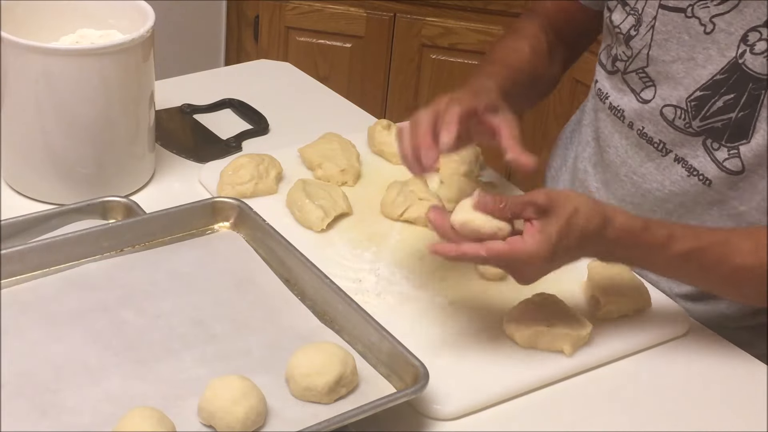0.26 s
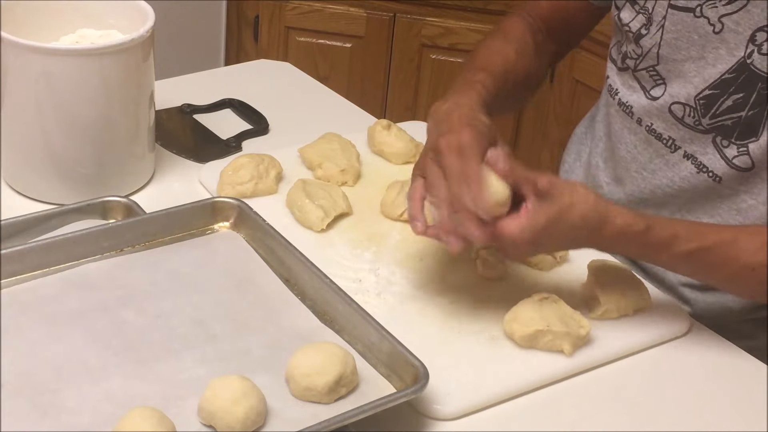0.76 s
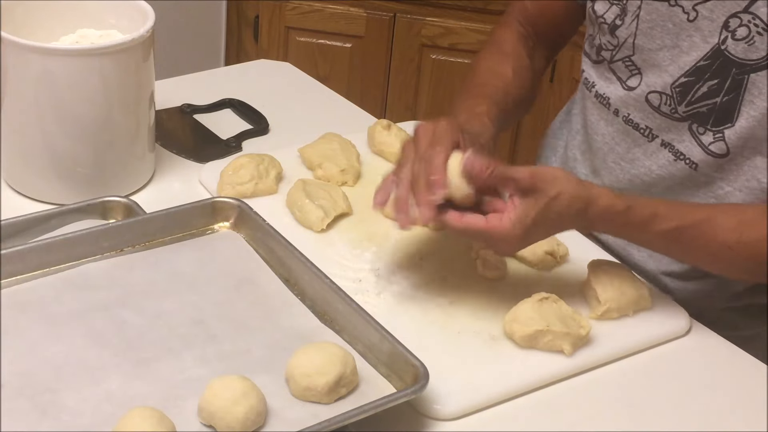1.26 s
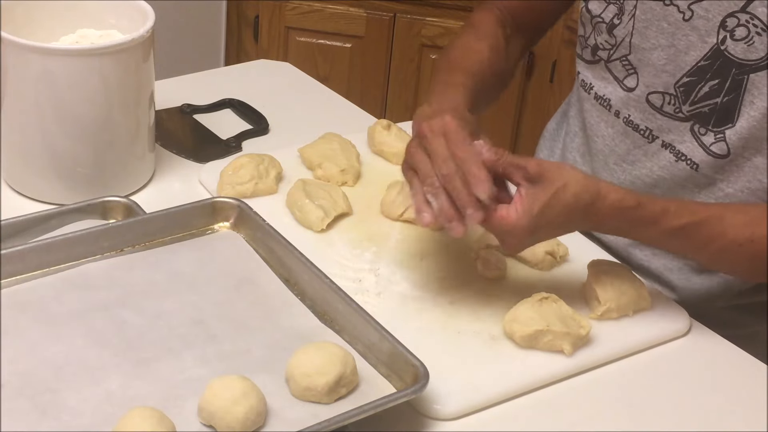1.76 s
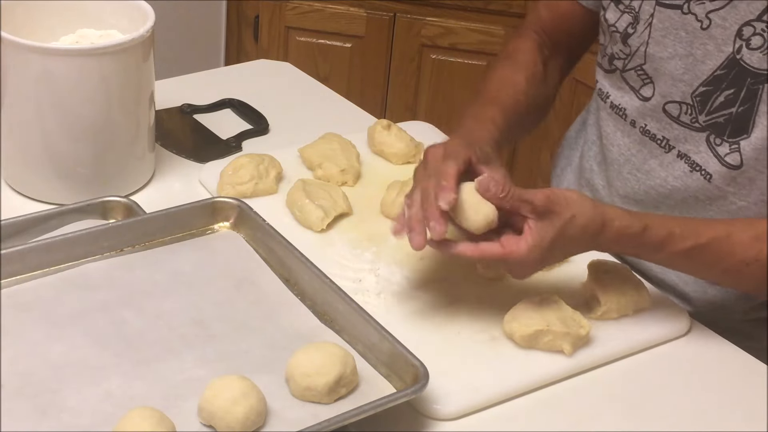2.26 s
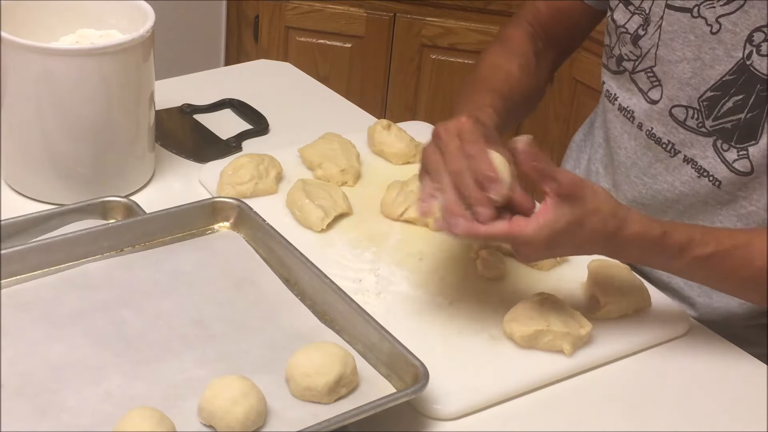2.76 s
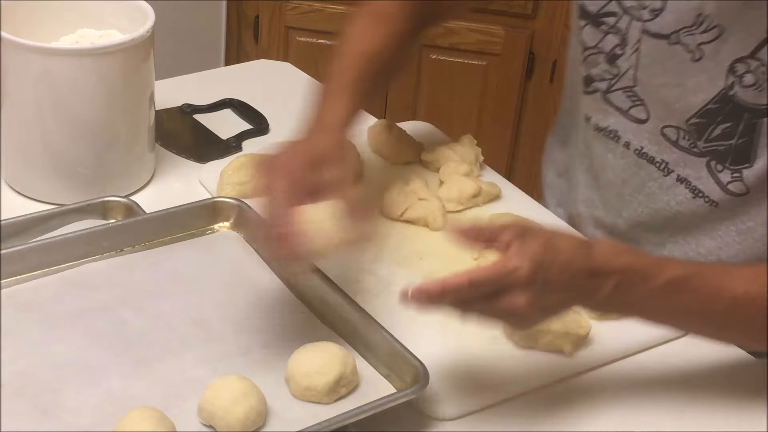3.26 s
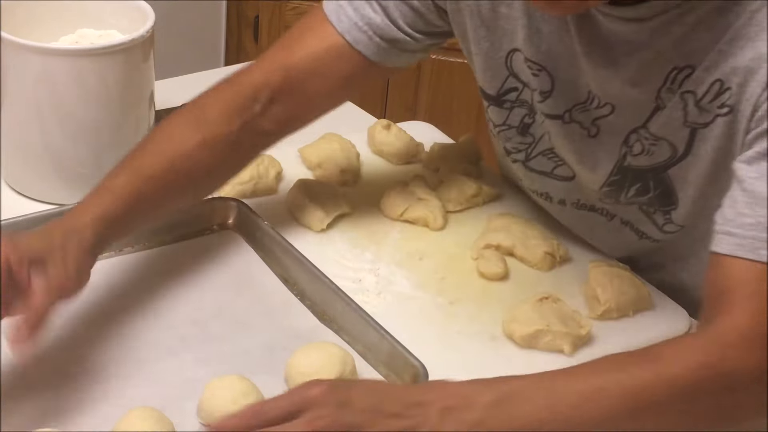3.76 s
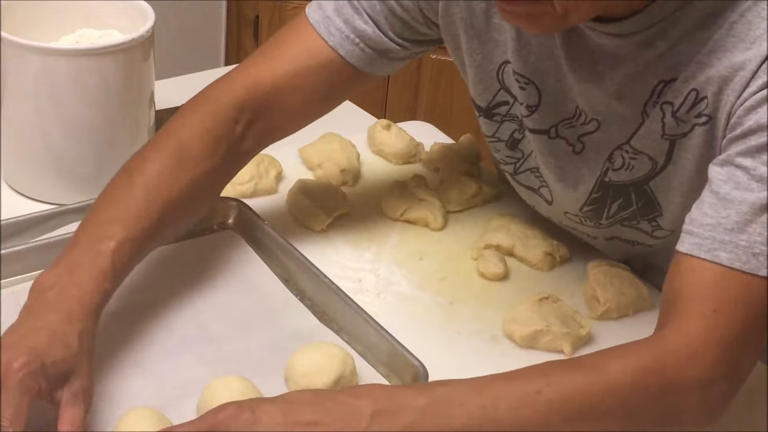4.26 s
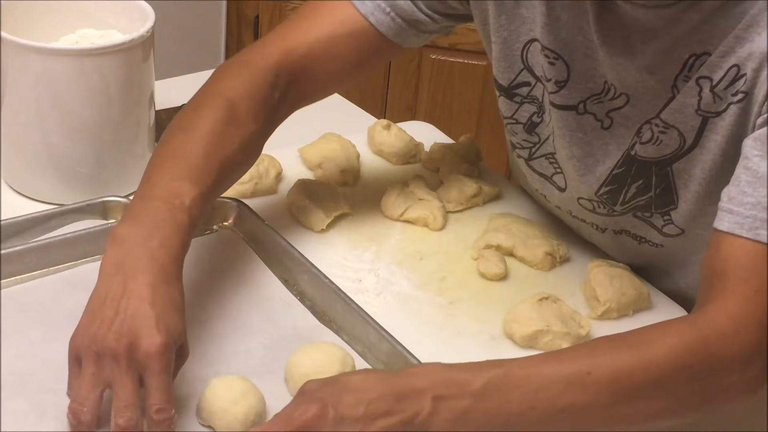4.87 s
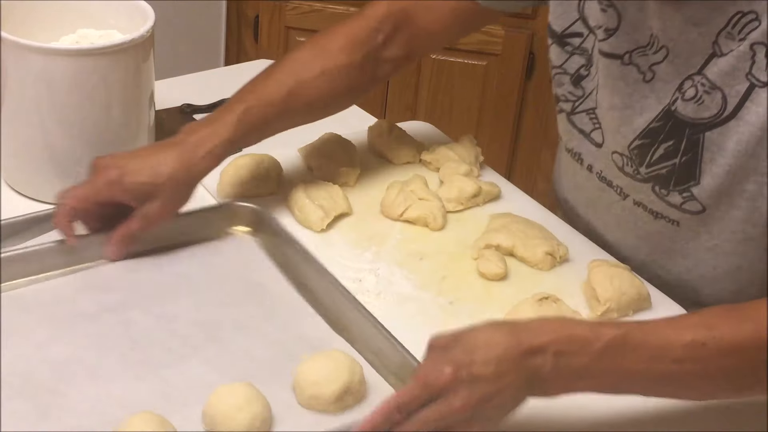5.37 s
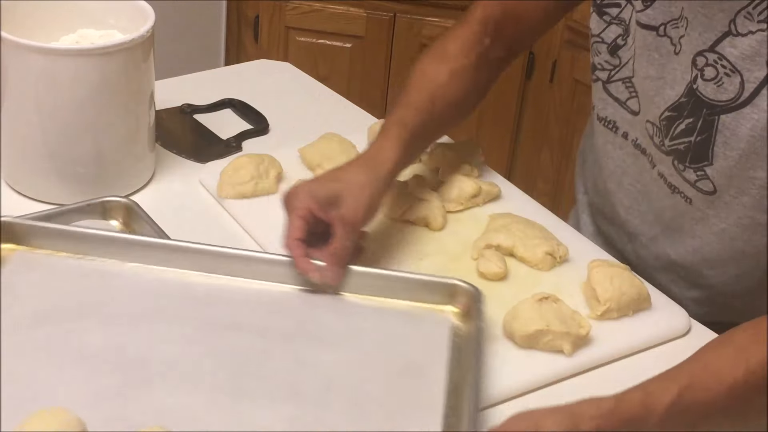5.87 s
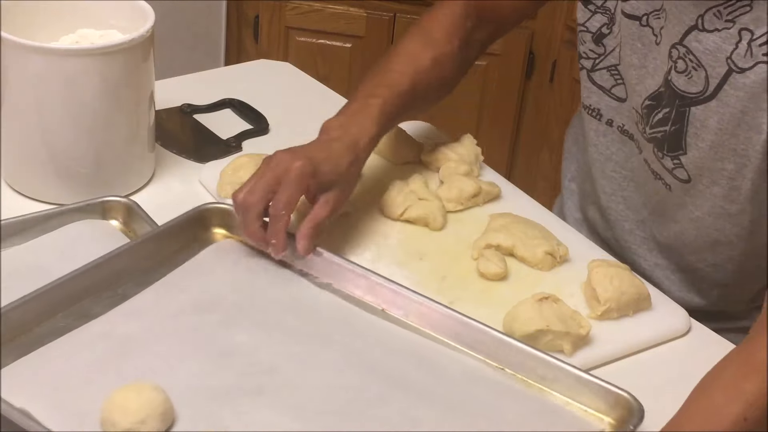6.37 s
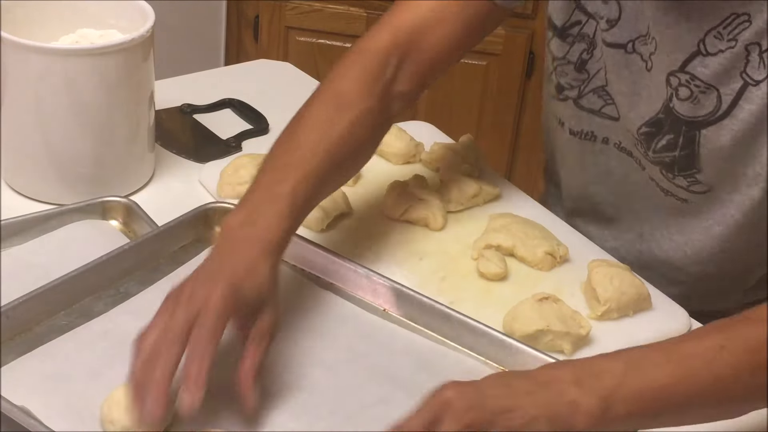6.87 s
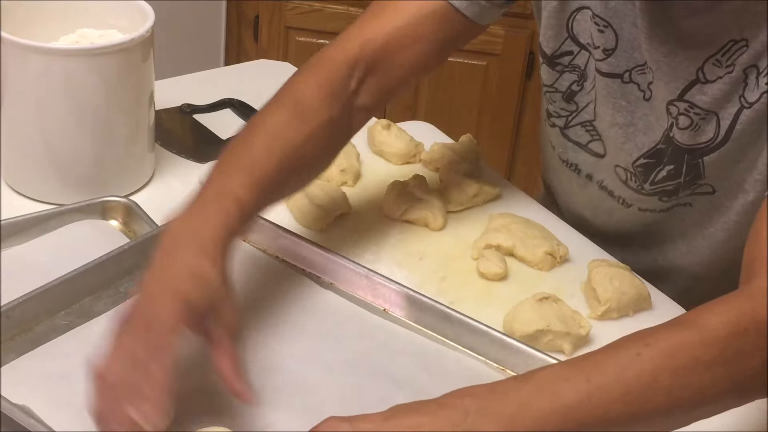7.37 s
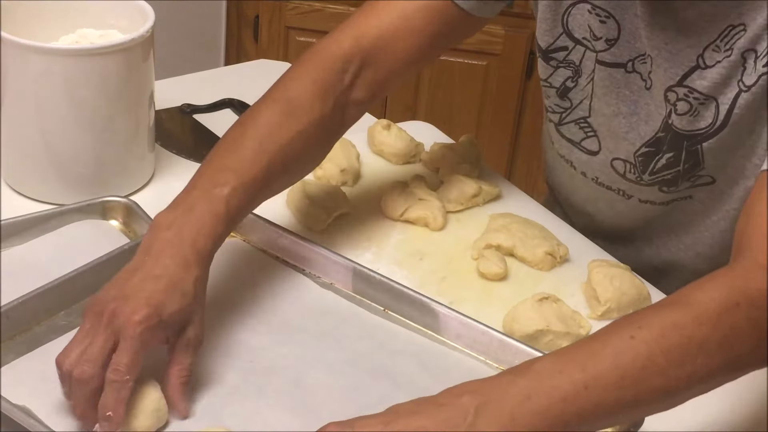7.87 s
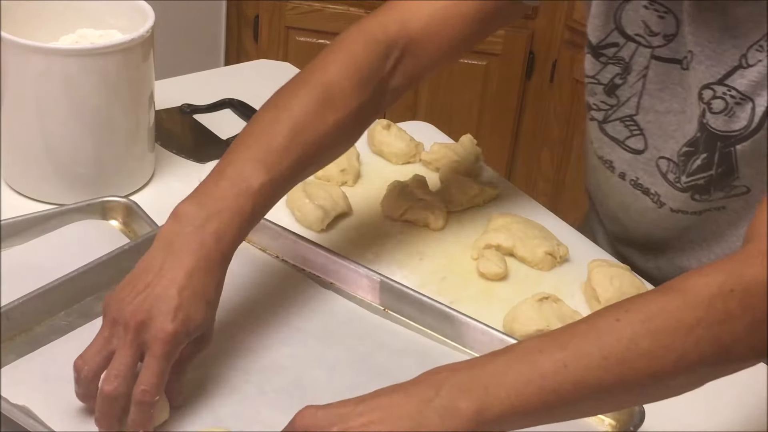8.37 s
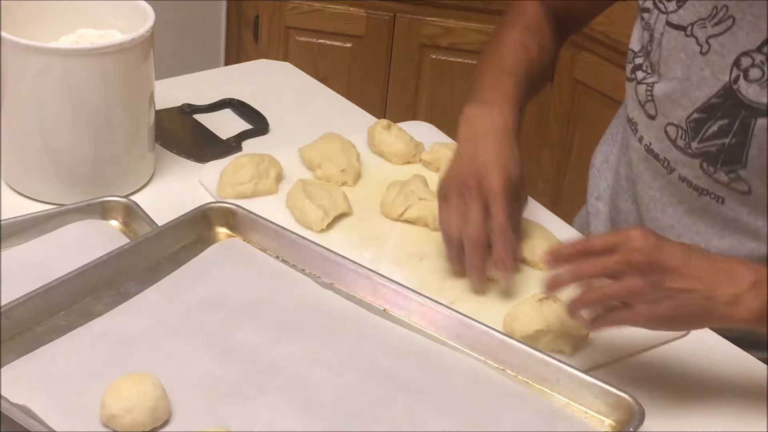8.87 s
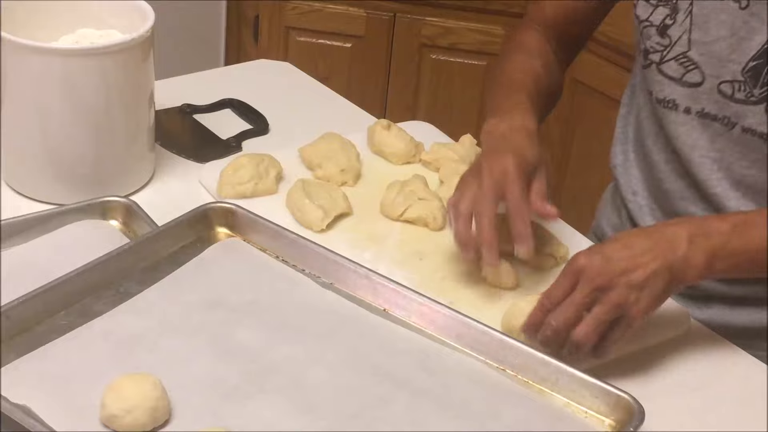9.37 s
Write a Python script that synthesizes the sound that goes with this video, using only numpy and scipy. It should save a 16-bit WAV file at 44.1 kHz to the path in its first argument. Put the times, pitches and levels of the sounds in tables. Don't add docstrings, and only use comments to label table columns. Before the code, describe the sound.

A low, slightly wavering refrigerator hum, near 60 and 120 Hz, continues throughout, heard by one close microphone in a hard-walled kitchen with short reverberation. From 0 to 3.2 seconds, palms roll dough: faint, airy, uneven skin strokes with tiny ticks. A soft thump at 3.4 precedes a loud metal tray knock at 3.7, a sharp crack with rapid bounces, paper rattle, counter boom and a brief ring. From 4 to 5.2, fingers rustle lining paper, with a crisp tick at 4.8. Thumps at 5.35 lead into a gritty, ringing drag around 5.5, a lighter push back from 5.85, and a final clicking scrape at 6.25-6.4. After near quiet, paper rubs and soft metallic creaks fill 7-8.7. At 9.3 a plastic board lands with a short dull clack and small bounces, leaving the hum.

```python
import sys
import numpy as np
from scipy import signal
from scipy.fft import rfft, irfft, next_fast_len
from scipy.io import wavfile
from scipy.ndimage import uniform_filter1d

SR = 44100
rng = np.random.default_rng(int(sys.argv[2]) if len(sys.argv) > 2 else 0)


def unload_audio(sound):
    columns = np.transpose(np.atleast_2d(sound))
    steps = np.round(np.clip(columns, -1, 1) * 32767)
    wavfile.write(sys.argv[1], SR, steps.astype(np.int16))


def ratio_of_db(decibels):
    return 10 ** (np.asarray(decibels, float) / 20)


N = 424241


def unit(x):
    return x / np.sqrt(np.mean(x ** 2))


def steady(x):
    return x / np.sqrt(uniform_filter1d(x ** 2, size=4000) + 1e-12)


def colour(x, points):
    hz, db = np.transpose(points)
    size = next_fast_len(len(x))
    f = np.maximum(np.arange(size // 2 + 1) * SR / size, 1)
    gain = ratio_of_db(np.interp(np.log(f), np.log(hz), db))
    return irfft(rfft(x, size) * gain, size)[:len(x)]


def band(x, lo_hz, hi_hz):
    sos = signal.butter(2, [lo_hz, min(hi_hz, 20000)], "band", fs=SR, output="sos")
    return signal.sosfilt(sos, x)


def ring(x, modes):
    out = np.zeros(N)
    live = np.flatnonzero(abs(x) > 1e-7)
    span = slice(live[0], live[-1] + SR)
    for hz, db, t60_s in modes:
        r = np.exp(-np.log(1000) / (np.clip(t60_s, .003, .42) * SR))
        w = 2 * np.pi * hz / SR
        out[span] += signal.lfilter([ratio_of_db(db) * np.sin(w)], [1, -2 * r * np.cos(w), r * r], x[span])
    return out


def walk(rate_hz):
    knots = rng.standard_normal(1000)
    return 1.4 * np.interp(np.arange(N) * (rate_hz / SR), np.arange(len(knots)), knots)


def grit(spread_db):
    return unit(rng.standard_normal(N) * ratio_of_db(spread_db * rng.exponential(size=N)))


def burst(at_s, db, decay_s):
    marks = np.zeros(N)
    marks[(np.asarray(at_s) * SR).astype(int)] = ratio_of_db(db)
    envelope = signal.lfilter([1], [1, -np.exp(-1 / (decay_s * SR))], marks)
    return envelope * rng.standard_normal(N)


def push(at_s, db, contact_s):
    marks = np.zeros(N)
    marks[(np.asarray(at_s) * SR).astype(int)] = ratio_of_db(db) * (-1) ** np.arange(len(db))
    shape = np.hanning(int(contact_s * SR) + 3)
    return signal.lfilter(shape / shape.sum(), [1], marks)


def strokes(rows, spread=1):
    depth_db = 20
    t = np.arange(0, N / SR, .002)
    s, db, rise_s, fall_s = np.array(rows)[:, :4, None].transpose(1, 0, 2)
    away = np.maximum((s - t) / rise_s, (t - s) / fall_s) / spread
    gain = np.sqrt(np.sum(ratio_of_db(db - depth_db * away) ** 2, axis=0))
    return np.interp(np.arange(N) / SR, t, gain)


def curves(tables):
    rows = np.concatenate(tables)
    t = np.arange(N) / SR
    hiss_db, drive_db = [np.interp(t, rows[:, 0], c, left=-110, right=-110) for c in rows.T[1:3]]
    return hiss_db, drive_db, np.interp(t, rows[:, 0], rows[:, 3])


# (multiple, level [dB rms], lower line [dB], upper line [dB])
HUM = [(1, -55, -66, -67), (2, -53.5, -71, -80), (3, -67, -70.5, -80), (4, -75, -76, -75),
       (5, -66, -65.5, -75), (6, -71, -72, -82), (7, -75, -80, -77), (8, -74, -80, -79),
       (9, -77, -75.5, -81), (10, -73.5, -79, -78), (11, -79, -86, -85), (12, -66.5, -81, -77),
       (13, -84, -88, -85), (14, -86, -81, -88), (16, -86, -81, -88), (19, -81, -87, -86)]
# (frequency [Hz], width [Hz], level [dB rms])
CABINET = [(60, 41, -63), (308.8, 60, -66), (208.6, 18, -66), (613, 32, -69)]
# (frequency [Hz], density [dB per Hz])
AIR = [(21, -31), (35, -3.5), (123, -6), (162, -9.5), (292, -6.5), (527, -16), (646, -21.5), (716, -13.5),
       (773, -15.5), (1020, -19), (1660, -31.5), (5000, -44), (6790, -46), (14300, -48.5), (15800, -46.5)]
PISTON_HZ, WOBBLE_HZ, AIR_DB = 58.9, 11.78, -54


def fridge():
    turn = 2 * np.pi * np.arange(N) / SR
    lines = 0
    for k, db, lower_db, upper_db in HUM:
        hz, lag = k * PISTON_HZ, 2 * np.pi * rng.random(2)
        lower = ratio_of_db(lower_db) * np.cos((hz - WOBBLE_HZ) * turn + lag[0])
        upper = ratio_of_db(upper_db) * np.cos((hz + WOBBLE_HZ) * turn + lag[1])
        pull = ratio_of_db(db) * np.cos(hz * turn + .12 * k * walk(1.5))
        lines = lines + np.sqrt(2) * ratio_of_db(walk(2)) * (lower + upper - pull)
    cabinet = 0
    for hz, w, db in CABINET:
        cabinet = cabinet + ratio_of_db(db) * unit(band(rng.standard_normal(N), hz - w / 2, hz + w / 2))
    air = ratio_of_db(AIR_DB + .7 * walk(2.6)) * unit(colour(rng.standard_normal(N), AIR))
    return lines + cabinet + air


# (time [s], peak [dB], pitch [Hz])
BUMPS = [
    (0.828, -39, 61.9),
    (3.371, -32.5, 100),
    (5.335, -30.5, 102),
    (5.35, -32, 99.6),
    (5.449, -35.5, 110),
    (6.14, -39, 287),
    (6.242, -37.5, 202),
    (9.001, -39, 126.4),
    (9.39, -36, 70.0),
]


def bumps():
    out = np.zeros(N)
    t = np.arange(int(.15 * SR)) / SR
    envelope = (t / 0.011) * np.exp(1 - t / 0.0082)
    for s, db, hz in BUMPS:
        i = int(s * SR)
        out[i:i + len(t)] += ratio_of_db(db) * np.sin(2 * np.pi * hz * t) * envelope
    return out


# (time [s], level [dB])
BOARD = [
    (9.329, -33),
    (9.342, -38),
    (9.365, -38),
    (9.399, -45),
]
# (frequency [Hz], level [dB], t60 [s])
BOARD_MODES = [(195, -18, 0.089), (248, -11.5, 0.19), (315.5, 5, 0.097), (420, -1, 0.022), (594, 1, 0.076),
               (726, -11, 0.072), (797, 12, 0.013), (912, -12, .1), (1184, -29, .06)]


def board():
    s, db = np.transpose(BOARD)
    edge = band(push([9.3205], [-35], 0.00046), 470, 3000)
    return ring(edge + push(s, db - 3, 0.0012), BOARD_MODES)


# (peak time [s], peak [dB], rise [s], fall [s])
ROLLS = [(.29, -74, .18, .05), (.47, -71.5, .02, 0.25), (.68, -70.5, 0.063, 0.23), (.75, -74, .1, .04),
         (.91, -64.5, 0.07, 0.073), (1.26, -62.5, 0.091, 0.22), (1.52, -64, 0.019, 0.041),
         (1.59, -63, 0.056, .05), (1.67, -66.5, .02, 0.14), (1.72, -71, 0.11, 0.055),
         (1.92, -65, .16, .045), (2.0, -68.5, .02, 0.2), (2.2, -65.5, 0.063, 0.1),
         (2.32, -59, 0.023, 0.062), (2.5, -72, 0.07, 0.13), (2.54, -65, .1, 0.05), (2.65, -69, .06, .025),
         (2.82, -69, 0.082, .14), (2.97, -64, 0.035, 0.045)]
# (peak time [s], peak [dB], rise [s], fall [s])
NUDGES = [(4.06, -55, 0.057, 0.043), (4.2, -58, 0.17, 0.045), (4.44, -66, 0.38, .07),
          (4.58, -63, 0.18, 0.076), (4.812, -54.5, .03, 0.16), (5.04, -62.5, 0.43, 0.042),
          (5.18, -65, 0.056, .19), (5.34, -49, 0.015, 0.1), (6.64, -56.5, 0.046, 0.046),
          (7.07, -54.5, 0.023, 0.072), (7.17, -50.5, .05, 0.16), (7.26, -54.5, 0.11, 0.037),
          (7.37, -55.5, 0.22, 0.048), (7.67, -63, .04, .2), (7.77, -50, 0.09, 0.026),
          (7.89, -53.5, 0.17, 0.041), (7.97, -51, .06, 0.061), (8.08, -49, 0.039, 0.14),
          (8.3, -55.5, 0.071, 0.16), (8.41, -53, 0.18, 0.059), (8.53, -47, 0.033, 0.025),
          (8.62, -57.5, 0.18, 0.083)]
# (peak time [s], peak [dB], rise [s], fall [s])
GRIPS = [
    (1.08, -73.5, 0.061, 0.094),
    (3.14, -62, 0.064, .11),
    (3.93, -63.5, .28, 0.34),
    (8.7, -64.5, 0.051, 0.12),
    (9.08, -73, .4, 0.052),
    (9.27, -60.5, 0.0396, .2),
    (9.35, -64.5, 0.21, 0.056),
]
# (time [s], speed as hiss [dB], pressure as drive [dB], favoured mode [Hz])
SLIDES = [
    [(5.4, -74, -66, 1340), (5.43, -51.5, -51, 1230), (5.478, -42.5, -42, 1050), (5.498, -36.5, -31.5, 930),
     (5.55, -39, -32, 970), (5.7, -49.5, -38.5, 1040), (5.77, -61, -44.5, 1050), (5.82, -62, -49, 975)],
    [(5.858, -52.5, -49, 1470), (5.876, -53.5, -39.5, 1530), (5.95, -50.5, -44, 995),
     (5.99, -49, -43, 1010), (6.1, -53.5, -40.5, 1010), (6.178, -48.5, -41.5, 1160),
     (6.232, -47.5, -48, 1050)],
    [(6.242, -41.5, -29, 1030), (6.262, -40.5, -42.5, 956), (6.32, -41, -39.5, 1800),
     (6.37, -40.5, -45.5, 1500), (6.402, -45, -45.5, 1155), (6.464, -55.5, -52.5, 1370),
     (6.55, -74, -76, 1100), (6.6, -79, -84, 960)],
]
# (frequency [Hz], density [dB per Hz])
SKIN = [(2350, -32.5), (4000, -8), (4190, -7.5), (4840, -8.5), (5610, 1.5), (9750, -3.5), (10600, -5),
        (13200, -1.5), (15800, -1.5)]
REST_DB = -89.5
SOFT_ROLL_DB, SOFT_NUDGE_DB, SOFT_GRIP_DB, SOFT_SLIDE_DB = -8, -11, 1.5, -2.5
SOFT_SPREAD = 1.3


def rubbing():
    slide = ratio_of_db(curves(SLIDES)[0])
    hiss = ratio_of_db(REST_DB) + slide
    soft = ratio_of_db(REST_DB) + ratio_of_db(SOFT_SLIDE_DB) * slide
    for rows, soft_db in ((ROLLS, SOFT_ROLL_DB), (NUDGES, SOFT_NUDGE_DB), (GRIPS, SOFT_GRIP_DB)):
        hiss = hiss + strokes(rows)
        soft = soft + ratio_of_db(soft_db) * strokes(rows, SOFT_SPREAD)
    uneven = ratio_of_db(1.9 * walk(55))
    bright_noise = unit(colour(np.clip(grit(2.8), -9, 9), SKIN))
    soft_noise = ratio_of_db(1.5 * walk(30)) * unit(band(grit(1.5), 1500, 5000))
    return uneven * (hiss * bright_noise + soft * soft_noise)


# (frequency [Hz], width [Hz], level [dB])
TRAY = [(461, 7.4, -11), (559.6, 32, -7), (624.4, 46, 2), (793, 40, -1), (891, 33, -0.5), (935, 47, 3),
        (1050, 37, -2), (1193, 53, -6.5), (1395, 40, -6), (1500, 42, -8.5), (1556, 60, -15),
        (1765, 38, -10), (1980, 48, -7), (2133, 40, -8), (2330, 80, -9.5), (2650, 80, -10), (3274, 60, -10),
        (3600, 60, -11), (4000, 39, -7.5), (4700, 55, -12), (5200, 40, -7.5)]


def tray(force, favoured_hz):
    out, place = 0, np.log2(favoured_hz)
    for hz, w, db in TRAY:
        octaves_off = np.minimum(abs(np.log2(hz) - place), 1)
        reach_db = 3.4 * walk(14) - 9.5 * octaves_off * (hz > 800)
        out = out + ring(force * ratio_of_db(reach_db), [(hz, db + 10 * np.log10(w / SR), 1.97 / w)])
    return out


# (time [s], crack peak [dB], tap peak [dB])
TICKS = [(0.6746, -49, -60.5), (0.8469, -55, -66), (1.235, -56, -66), (1.5104, -58, -70),
         (1.5787, -53, -68), (1.6711, -46, -52), (2.1943, -57, -68), (2.9596, -56, -68), (3.1222, -49, -66),
         (2.318, -52, -61), (3.1008, -49, -63), (4.0558, -37.5, -48), (4.4134, -40, -52), (4.8, -42, -68),
         (4.8064, -32, -62), (4.817, -43.5, -66), (4.828, -51, -66), (4.874, -41, -63), (5.332, -30, -50),
         (5.4294, -40, -38), (5.4655, -42, -46), (5.532, -30, -38.5), (5.568, -29, -40), (5.8528, -46, -50),
         (6.1097, -42, -50), (5.4827, -28, -23), (5.7934, -55, -38.5), (6.2394, -29, -30),
         (6.3486, -20.5, -38), (7.0614, -42, -70.5), (7.1501, -42, -66), (7.2295, -44, -66),
         (7.2425, -37, -66), (7.2553, -33.5, -66), (7.6171, -47.5, -67), (7.665, -50, -66),
         (7.759, -45, -55), (7.892, -38, -52.5), (8.283, -47, -64), (8.514, -49, -60), (8.6093, -49, -64),
         (8.6918, -34.5, -54), (9.3199, -34, -43), (9.3405, -36, -51)]


def ticks():
    s, crack_db, tap_db = np.transpose(TICKS)
    crack_and_rustle = burst(s, crack_db - 4.5, 0.0005) + burst(s, crack_db - 14.5, 0.0073)
    click = band(push(s, crack_db + 9, .00006), 1600, 13000)
    tap = ring(push(s, tap_db - 13, 0.0002), [(hz, db, 5.3 / w) for hz, w, db in TRAY])
    return band(crack_and_rustle, 2400, 13000) + click + tap


# (peak time [s], peak [dB], rise [s], fall [s], frequency [Hz])
SINGING = [(5.53, -41, .08, 0.18, 3980), (5.52, -46.5, 0.044, .12, 3270), (5.5, -38, .02, 0.25, 920),
           (5.52, -40.5, .06, 0.33, 640), (5.885, -43, .03, 0.083, 1700), (5.98, -52, .05, .06, 5600),
           (6.07, -45, .12, .1, 931), (6.12, -51, .03, .15, 3310), (6.13, -47, .08, .08, 1090),
           (6.17, -48, .1, .08, 1420), (6.17, -40.5, .06, .1, 470), (6.25, -39.5, .03, 0.26, 940),
           (6.245, -43, .02, .05, 1450), (6.33, -39.5, 0.15, .06, 2120), (6.29, -48, .04, .05, 5420),
           (7.2, -46.5, .015, .08, 1316), (7.205, -51.5, .015, 0.047, 1800), (7.765, -55, .02, .04, 6800),
           (7.77, -60, 0.036, 0.036, 3270), (7.765, -45, .05, .06, 1050), (7.87, -61, .12, .1, 2750),
           (7.825, -62.5, 0.032, 0.083, 4000), (8.1, -47.5, .08, .12, 1060), (1.24, -69, .02, .06, 3400)]
SINGING_T60_S, SINGING_DB = .028, -5


def singing():
    force, out = np.clip(grit(2.8), -5, 5), np.zeros(N)
    half_width_hz = 2 / SINGING_T60_S
    for row in SINGING:
        s, hz = row[0], row[4]
        span = slice(int((s - .4) * SR), int((s + .6) * SR))
        tone = band(force[span], hz - half_width_hz, hz + half_width_hz)
        out[span] += ratio_of_db(SINGING_DB) * unit(tone) * strokes([row])[span]
    return out


# (time [s], crack [dB], ring [dB], boom [dB], favoured mode [Hz])
KNOCK = [
    (3.676, -50, -58.5, -66.5, 900),
    (3.688, -44, -60, -66, 900),
    (3.6972, -10, -24, -33, 948),
    (3.699, -6, -25, -33, 950),
    (3.709, -23, -14.5, -18, 980),
    (3.717, -24, -16, -22, 449.6),
    (3.735, -17, -19, -18.5, 1220),
    (3.751, -19.5, -18, -20, 560),
    (3.768, -19.5, -17, -24.5, 520),
    (3.779, -28, -18, -30, 601.4),
]
# (frequency [Hz], level [dB], t60 [s])
KNOCK_MODES = [(355.0, -13, 0.3), (447, 0, 0.14), (542, -9, 0.28), (576, -3, 0.22), (617, -3, 0.24),
               (760, -16.0, 0.32), (873, -7, 0.2), (911, -13.0, 0.32), (995, -5, 0.32), (1221, -4, 0.2),
               (1534, -13.5, 0.27), (408.5, -8, 0.2), (700, -13.5, 0.23), (787, -12, 0.34), (931, -7, 0.27),
               (1100, -10, 0.27)]
# (frequency [Hz], level [dB], t60 [s])
RIM_MODES = [(1670, -7.5, 0.087), (2150, -4.5, 0.06), (1900, -11.5, 0.26), (2519, -8.5, 0.1),
             (3540, -13, 0.18), (3849, -9, 0.26), (4220, -16, 0.3), (5144, -4, 0.06), (5480, -6.5, 0.16),
             (6094, 0, 0.12), (6310, -10.5, 0.66), (6638, -2.5, 0.2)]
# (frequency [Hz], level [dB], t60 [s])
BOOM_MODES = [(83.05, 2.5, 0.097), (110, -0.5, 0.092), (141, 3, 0.13), (189, -9.5, 0.055), (256, -14, 0.05)]
# (frequency [Hz], density [dB per Hz])
CRACK = [(120, -38), (200, -16), (366, -8), (455, -1.5), (656, -5), (1200, -7.5), (2540, -13), (2730, -15),
         (4730, -19.5), (6000, -15.5), (15800, -30)]
SPOT_DB_PER_OCTAVE = -9


def knock():
    s, crack_db, ring_db, boom_db, spot_hz = np.transpose(KNOCK)
    rattle = burst(s, crack_db + 6, 0.0034) + burst(s, crack_db - 4, 0.034)
    crack = colour(rattle, np.add(CRACK, [0, 8]))
    paper_snap = ratio_of_db(-14) * band(burst(s, crack_db + 6, 0.0051), 9900, 16000)
    sheet = ratio_of_db(-11) * ring(burst(s, ring_db - 21, .002), RIM_MODES)
    for mode in KNOCK_MODES:
        octaves_off = np.minimum(abs(np.log2(mode[0] / spot_hz)), 1)
        sheet = sheet + ring(push(s, ring_db - 5 + SPOT_DB_PER_OCTAVE * octaves_off, .0002), [mode])
    boom = band(ring(push(s, boom_db, 0.0042), BOOM_MODES), 89, 400)
    return crack + paper_snap + sheet + boom


# (peak time [s], peak [dB], rise [s], fall [s], favoured mode [Hz])
PRESSES = [(3.98, -48.5, 0.035, 0.64, 1100), (4.07, -62, .1, 0.18, 1018), (4.25, -79, .06, .2, 920),
           (6.15, -43.5, 0.014, 0.096, 560), (7.14, -57, 0.11, .3, 1100), (7.2, -52, .015, 0.19, 1400),
           (7.272, -66, .2, .09, 1130), (7.65, -58, .04, .4, 1020), (7.764, -44.5, .05, 0.054, 1050),
           (7.82, -54.5, .05, .4, 1000), (7.954, -47.5, .015, .075, 970), (8.03, -59, .2, .2, 1070),
           (8.092, -43, .05, .13, 1050), (8.418, -50, .135, 0.13, 983), (8.7, -62, .02, .3, 1300)]
LOW_PRESS_DB, LOW_SLIDE_DB = -3, -3
LOW_DB_PER_OCTAVE = -11.5


def low_weight(favoured_hz):
    return ratio_of_db(LOW_DB_PER_OCTAVE * np.log2(favoured_hz / 1000))


def dragging():
    _, slide_db, slide_hz = curves(SLIDES)
    slide, press = ratio_of_db(slide_db), strokes(PRESSES)
    press_hz = np.interp(np.arange(N) / SR, *np.transpose(PRESSES)[[0, 4]])
    favoured_hz = np.where(slide > press, slide_hz, press_hz)
    low_slide = ratio_of_db(LOW_SLIDE_DB) * slide * (slide / ratio_of_db(-32)) ** .4 * low_weight(slide_hz)
    low_press = ratio_of_db(LOW_PRESS_DB) * press * low_weight(press_hz)
    force = np.clip(grit(3.1), -5, 5) * ratio_of_db(2.5 * walk(60)) * (slide + press > ratio_of_db(-110))
    sheet = tray(force, favoured_hz) + ratio_of_db(-30) * force
    high_part = (slide + press) * steady(band(sheet, 800, 4000))
    low_part = (low_slide + low_press) * steady(band(sheet, 380, 819.5))
    return ratio_of_db(-2) * (high_part + low_part)


ROOM_T60_S, ROOM_DB = 0.42, -12.5


def room(x):
    t = np.arange(int(.8 * SR)) / SR
    noise = rng.standard_normal((2, len(t))) * (1 - np.exp(-t / 0.0037))
    low = band(noise[0], 86, 2500) * ratio_of_db(-60 * t / ROOM_T60_S)
    high = band(noise[1], 2800, 16000) * ratio_of_db(-60 * t / (0.9 * ROOM_T60_S))
    tail = low + ratio_of_db(-5.5) * high
    return x + ratio_of_db(ROOM_DB) * signal.fftconvolve(x, tail / np.sqrt(np.sum(tail ** 2)))[:N]


def scene():
    hands = rubbing() + ticks() + bumps()
    metal = dragging() + knock() + singing()
    mono = room(hands + metal + board()) + fridge()
    return np.array([mono, mono])


# (frequency [Hz], gain [dB])
MIC = [(20, -21.5), (42, -0.5), (4400, 0), (4800, -0.5), (5300, 0.5), (10000, 2.5), (10500, -2.5),
       (11000, 3), (15750, -1), (15900, -72)]


def microphone(x):
    return np.tanh(0.59 * colour(x, MIC)) / 0.61


THIN_MILD = [.186, .42, .506, .954, 1.039, 1.167, 2.874, 3.407, 5.135, 6.948, 8.932, 8.954, 9.103, 9.21,
             9.444, 9.466]
# (time [s], twice the number of spectral lines kept)
THIN_DEEP = [(.719, 22), (1.274, 12), (1.572, 8), (1.978, 33), (2.042, 22), (2.148, 15), (2.511, 29),
             (2.682, 21), (2.788, 19), (3.194, 24), (3.279, 23), (3.748, 58), (4.367, 25), (4.452, 13.4),
             (4.474, 24), (4.9, 19), (5.092, 25), (5.455, 16), (5.519, 34), (5.924, 24), (6.436, 20.5),
             (7.823, 33), (7.866, 38), (7.994, 36), (8.207, 8.6)]
FRAME, FRAME_STEP, FRAME_START = 941, 940.8, 659.9
MILD_HZ, MILD_LINES, DEEP_HZ = 1400, 11, 1152


def thin_treble(x, kept_db=7.0):
    n, k = np.arange(2 * FRAME), np.arange(FRAME)
    window = np.sin(np.pi * (n + .5) / (2 * FRAME))
    basis = window * np.cos(np.pi / FRAME * np.outer(k + .5, n + .5 + FRAME / 2))
    frames = [(s, MILD_HZ, MILD_LINES) for s in THIN_MILD] + [(s, DEEP_HZ, c) for s, c in THIN_DEEP]
    out = x.copy()
    for s, hz, count in frames:
        centre = int(round((s * SR - FRAME_START) / FRAME_STEP) * FRAME_STEP + FRAME_START)
        span = slice(centre - FRAME, centre + FRAME)
        lines = basis @ x[span]
        around = uniform_filter1d(abs(lines), size=30) + 1e-9
        height = abs(lines) / around * (k + 1.) ** -.12
        height[k > .72 * FRAME] = 0
        low = k < hz * 2 * FRAME / SR
        threshold = np.sort(height[~low])[-max(int(count / 2), 1)]
        gain = np.where(height >= threshold, ratio_of_db(kept_db), 0)
        out[span] += (lines * np.where(low, 0, gain - 1)) @ basis * 2 / FRAME
    return out


def band_limit(x):
    return signal.sosfilt(signal.butter(12, 16580, fs=SR, output="sos"), x)


def record(dry):
    mono = thin_treble(microphone(dry[0]))
    return band_limit(np.array([mono, mono]))


dry = scene()
out = record(dry)
unload_audio(out)
```